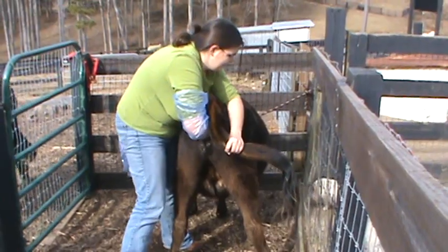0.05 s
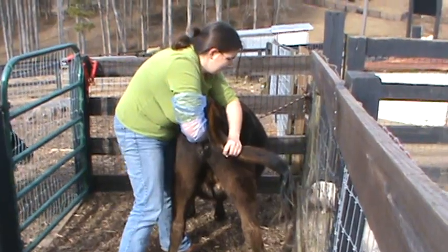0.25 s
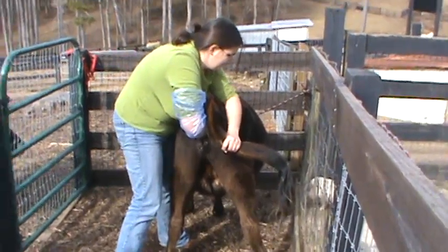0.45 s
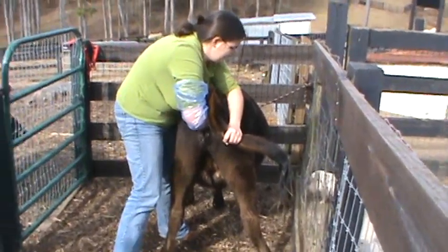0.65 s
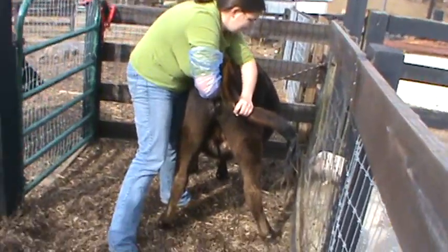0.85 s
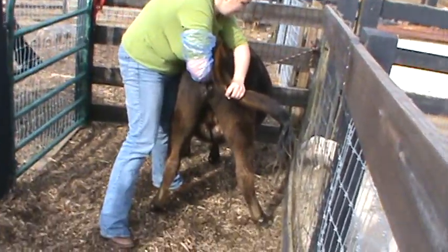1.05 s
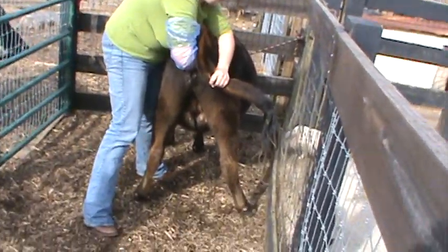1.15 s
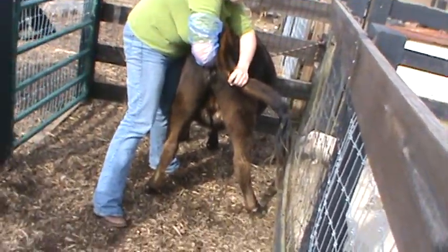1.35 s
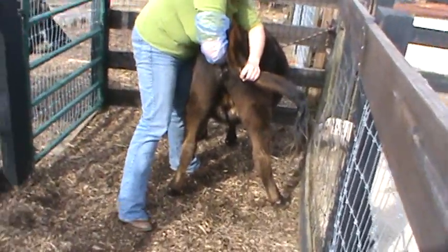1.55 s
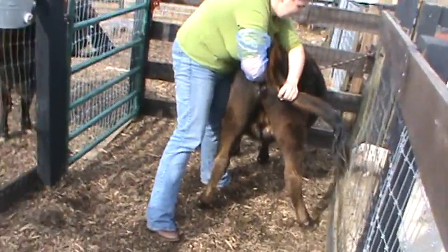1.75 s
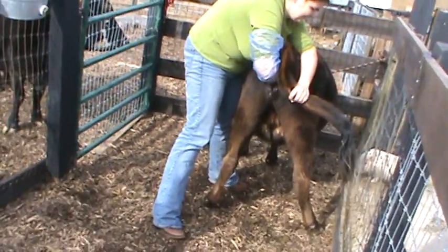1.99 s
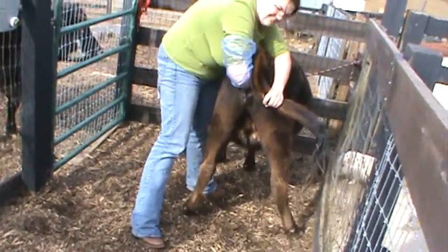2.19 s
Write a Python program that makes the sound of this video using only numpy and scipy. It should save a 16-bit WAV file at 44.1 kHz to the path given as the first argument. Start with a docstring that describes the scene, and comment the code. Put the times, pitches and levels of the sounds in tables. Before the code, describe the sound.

A cow's hooves shuffle on dry wood chips in an outdoor pen under soft, steady farm air. Light rustles and a short scuff come near 0.4 s, then a scrape and faint dull knocks around 1 s. Crunching and snapping thicken from 1.2 s. At 1.56 s a loud, dry kick cracks and clatters on a fence board. A low wind buffet hits the microphone at 1.8 s; small snaps and rustling continue to the end.

```python
"""A cow shifts its hooves on wood-chip bedding in an outdoor pen, over soft farm air that is shaped noise.
From the start, clouds of tiny clicks make the crunch and rustle, ringing grit makes short scuffs,
and bursts of noise make single snaps, most of them after 1.2 s. Faint knocks come near 1 s.
At 1.56 s a kick knocks a fence board, a sum of fading tones with cracks and clatter.
From about 1.8 s a gust buffets the microphone: smooth pressure dips over low rumble."""
import sys
import numpy as np
from scipy import signal
from scipy.fft import rfft, irfft
from scipy.io import wavfile
from scipy.ndimage import uniform_filter1d

SR = 44100
rng = np.random.default_rng(int(sys.argv[2]) if len(sys.argv) > 2 else 0)


def wav_out(sig):
    """Save sig, one row per channel (or a flat mono array), as 16-bit PCM at SR to the path in sys.argv[1]."""
    wavfile.write(sys.argv[1], SR, np.round(np.clip(np.atleast_2d(sig).T, -1, 1) * 32767).astype(np.int16))


N = 98034  # length in samples

# Tone of the farm air, before its level is set: (f/Hz, level/dB)
AIR_SPECTRUM = [(25, -21), (80, 2), (500, -5.5), (1800, -20), (8100, -19.5), (11000, -27), (16000, -27)]
# How wide the spread-out sounds are: (f/Hz, side minus mid/dB)
STEREO_WIDTH = [(40, -24), (200, -17.5), (2000, -5.5), (6000, -13), (12000, -7.5)]
# Wind buffets, before filtering: (t/s of the middle, peak level/dB, width/ms)
BUFFETS = [(.735, -41, 4.5), (1.803, -24, 2.7), (1.815, -22, 6.8), (1.833, -22, 1.76), (1.8422, -26, 2.3),
           (1.856, -33, 4.9), (1.879, -35, 3.4), (1.913, -32, 3.1), (2.207, -40, 3)]
# Loudness of the wind rumble, before it wanders: (t/s, level/dB)
RUMBLE_LEVEL = [(1.45, -58), (1.62, -44.5), (1.85, -43), (1.94, -46.5), (2.1, -56.5)]
# Chips under moving weight, before wandering: (t/s, dull crunch level/dB, fine rustle level/dB)
SHUFFLE_LEVELS = [(0, -55, -85), (.38, -54.5, -60), (.44, -43, -43), (.49, -51.5, -51.5), (.6, -53, -51),
                  (.7, -54.5, -57), (0.939, -53, -58.5), (1.04, -50.5, -48.5), (1.151, -46, -47),
                  (1.182, -38, -48), (1.24, -43.5, -48), (1.3, -39.5, -43.5), (1.41, -41, -42),
                  (1.53, -47.5, -46), (1.6, -41, -45), (1.7, -46, -50.5), (1.83, -50, -45),
                  (1.87, -51.5, -53), (1.97, -50.5, -54), (1.99, -49.5, -42.5), (2.14, -48, -49.5),
                  (2.22, -50, -37.5)]
# Tone of the crunch and of the rustle, before their levels are set: (f/Hz, level/dB)
CRUNCH_SPECTRUM = [(120, -7.5), (400, 1.5), (1200, -2.5), (2500, -10), (12000, -36)]
RUSTLE_SPECTRUM = [(1500, -6.5), (6000, -5), (8700, -1.5), (10800, -11.5), (15000, -18)]
# A hoof dragged through chips: (start t/s, length/s, level/dB, treble minus bass/dB, left minus right/dB)
SCUFFS = [(0.161, 0.046, -54.5, 17.5, -1), (0.387, 0.12, -45, 1, 1), (0.669, 0.02, -54, 16, 2),
          (0.958, 0.088, -38, 1, -3.5), (1.286, 0.058, -43, 15, 1), (1.406, 0.088, -32, -1, -3.5),
          (1.893, 0.0052, -33, 3, 4), (2.19, 0.031, -38.5, 7.5, 4)]
# Resonances of the grit: (f/Hz, width of each of two passes/Hz, relative level/dB)
GRIT_RINGS = [(2545, 1400, 2.5), (4000, 870, -5.5), (5260, 650, -4), (6690, 940, 0.5), (8150, 2030, 0.5)]
# Single chips snapping: (t/s, peak level/dB, f/Hz, left minus right/dB)
SNAPS = [(0.0868, -30, 6900, 0.5), (0.8738, -30, 8200, 1), (0.8801, -22, 8800, 3.5),
         (1.2929, -22.5, 4400, 6.5), (1.327, -21, 5000, 2.5), (1.3522, -17, 2120, 0),
         (1.3578, -28, 5000, 1.5), (1.3735, -24.5, 4000, 1.5), (1.4622, -15.5, 7760, 9),
         (1.4963, -18, 9060, 5), (1.5253, -22.5, 8040, 1.0), (1.7915, -24, 4240, -7),
         (1.9493, -20.5, 6600, 6), (1.9761, -18, 7650, 5), (2.0932, -19.5, 4650, 5.5),
         (2.194, -20.5, 7000, 10)]
# Blows on the fence board: (t/s, peak level of the ring/dB, contact/ms, left minus right/dB)
BLOWS = [(0.959, -35.5, 1.2, 0), (1.03, -32, 1.6, 0.5), (1.06, -27, 1.16, -1), (1.067, -25.5, 0.75, -2),
         (1.559, -6, 0.48, 5.5), (1.5634, -12.5, 0.88, -3), (1.5772, -10, 0.11, 6.5),
         (1.5804, -20.5, 0.18, -9), (1.596, -21, 0.11, -3), (1.7916, -26, 0.32, -3)]
# Tones of the board: (f/Hz, relative level/dB, time to fade by 60 dB/s)
BOARD_TONES = [(222, 1.5, 0.028), (370, -4, 0.077), (554, 5, 0.014), (756, -0.5, 0.02), (983, 0.5, 0.016),
               (1417, -11.5, 0.036), (1600, -5.5, 0.021), (1890, 0, 0.016), (2190, -0.5, 0.014),
               (3900, -5, 0.0096)]

AIR_DB = -50
BUFFET_HZ, BUFFET_WIDTH_HZ = 68, 89
GUST_SIDE_DB = -0.5
PEN_DB, PEN_T60_S, PEN_HZ = -22, 0.23, 1600
SHUFFLE_PAN_DB = 1.6  # left minus right
SCUFF_EDGE = 0.19  # fade-in as a share of the scuff; the fade-out is twice as long
SCUFF_SPLIT_HZ = 3500  # border between scuff bass and treble
SNAP_T60_S, SNAP_WIDTH = 0.007, 0.45  # width is a share of the pitch
CRACK_DB, CRACK_S, CLATTER_DB, CLATTER_S = -4, 0.00053, -17.5, 0.011
THIN_HZ_MS = 50.6  # divided by the contact in ms, gives the bass cut in Hz
SWELL_CYCLES = 0.3  # how many cycles a board tone takes to swell
BASS_PER_PAN_DB = 0.28
DULL_HZ, TOP_HZ = 8600, 15800  # treble limits of the hits and of the whole sound


def amp(db):
    """Turn decibels into a multiplier."""
    return 10 ** (np.asarray(db) / 20)


def unit(x):
    """Scale to an average (RMS) strength of 1."""
    return x / np.sqrt(np.mean(x ** 2))


def read(table, hz):
    """Read the dB of a spectrum table on a log frequency axis."""
    f, db = np.array(table).T
    return np.interp(np.log(hz + 1), np.log(f), db)


def colour(x, table):
    """Shape the tone of a sound with a spectrum table."""
    gain = amp(read(table, np.fft.rfftfreq(N, 1 / SR)))
    return irfft(rfft(x) * gain, N)


def ring(x, hz, width_hz):
    """Resonate around one pitch, with gain 1 at the centre."""
    return signal.lfilter(*signal.iirpeak(min(hz, 18000), hz / width_hz, fs=SR), x)


def pan(x, db):
    """Make stereo with the left louder than the right by db."""
    return np.array([x * amp(db / 2), x * amp(-db / 2)])


def walk(rate):
    """Wander smoothly at random, with about `rate` new values a second."""
    k = int(SR / rate)
    steps = np.repeat(rng.standard_normal(N // k + 1), k)
    smooth = uniform_filter1d(uniform_filter1d(steps, k), k)
    return unit(smooth[:N])


def grains(rate, scatter_db):
    """Scatter random clicks, about `rate` a second, with a few larger ones."""
    present = rng.random(N) < rate / SR
    size = rng.standard_normal(N)
    boost = amp(scatter_db * np.minimum(rng.exponential(size=N), 4))
    return unit(present * size * boost)


def wide(make):
    """Spread a sound by building mid and side from two separate random draws."""
    mid = make()
    side = colour(make(), STEREO_WIDTH)
    return np.array([mid + side, mid - side])


def add(out, s, sound):
    """Mix a sound in at time s, cutting what runs past the end."""
    i = int(s * SR)
    out[:, i:i + sound.shape[1]] += sound[:, :N - i]


def farm_air():
    """Shaped noise whose level wanders slightly gives the steady air of the farm."""
    noise = wide(lambda: unit(colour(rng.standard_normal(N), AIR_SPECTRUM)))
    return noise * amp(AIR_DB + .5 * walk(10.4))


def wind(t):
    """Wind presses on the microphone: soft dips, uneven between its sides, over a little rumble."""
    push = sum(-amp(db) * np.exp(-((t - s) * 1000 / (ms / 2)) ** 2) for s, db, ms in BUFFETS)
    thump = signal.lfilter(*signal.butter(2, 52, "high", fs=SR), push)
    thump = thump + 2.47 * ring(push, BUFFET_HZ, BUFFET_WIDTH_HZ)
    s, db = np.array(RUMBLE_LEVEL).T
    rumble = wide(lambda: unit(ring(rng.standard_normal(N), 70.0, 76.0)))
    rumble = rumble * amp(np.interp(t, s, db) + 1.1 * walk(10.8))
    flutter = unit(ring(rng.standard_normal(N), 97.0, 100.0))
    # opposite signs left and right make the push uneven
    side = amp(GUST_SIDE_DB) * uniform_filter1d(push, size=400) * flutter * np.array([[1], [-1]])
    return thump + side + rumble


def pen(x):
    """Rails and walls scatter the sound back as a fading, dull tail of noise."""
    u = np.arange(int(.3 * SR)) / SR
    fade = amp(-60 * u / PEN_T60_S) * (u > .004)  # silent for the first 4 ms
    tails = rng.standard_normal((2, len(u))) * fade
    tails = signal.lfilter(*signal.butter(1, PEN_HZ, fs=SR), tails)
    tails /= np.sqrt(np.sum(tails ** 2, axis=1, keepdims=True))
    return amp(PEN_DB) * signal.fftconvolve(x, tails, axes=1)[:, :N]


def shuffle(t):
    """Chips crunch and rustle under moving weight, as two clouds of tiny clicks."""
    s, crunch_db, rustle_db = np.array(SHUFFLE_LEVELS).T
    crunch = wide(lambda: unit(colour(grains(4000., 2.7), CRUNCH_SPECTRUM)))
    crunch = crunch * amp(np.interp(t, s, crunch_db) + 1.3 * walk(17.38))
    rustle = wide(lambda: unit(colour(grains(8000., 2.0), RUSTLE_SPECTRUM)))
    rustle = rustle * amp(np.interp(t, s, rustle_db) + 2.25 * walk(25.25))
    return (crunch + rustle) * pan(np.ones(1), SHUFFLE_PAN_DB)


def scuffs(t):
    """Dense grit rings short, flickering resonances while a hoof drags."""
    low, high = np.zeros(N), np.zeros(N)
    for f, width, db in GRIT_RINGS:
        grit = ring(ring(grains(6000., 2.3), f, width), f, width)
        band = high if f > SCUFF_SPLIT_HZ else low
        band += amp(db + 2.9 * walk(90.)) * grit
    scale = np.std(low + high)
    low, high = low / scale, high / scale
    out = 0
    for s, length, db, treble_db, pan_db in SCUFFS:
        u = (t - s) / length  # runs from 0 to 1 during the scuff
        env = np.clip(np.minimum(u, (1 - u) / 2) / SCUFF_EDGE, 0, 1)
        drag = low * amp(db - treble_db / 2) + high * amp(db + treble_db / 2)
        out = out + pan(env * drag, pan_db)
    return out


def snaps():
    """Each snapping chip is a fading burst of noise in a broad band around its own pitch."""
    out, u = np.zeros((2, N)), np.arange(600) / SR
    for s, db, hz, pan_db in SNAPS:
        noise = rng.standard_normal(600)
        noise[0] = 4.  # the first crack is sharp
        x = ring(noise, hz, SNAP_WIDTH * hz) + 0.14 * noise
        x = x * amp(-60 * u / SNAP_T60_S)
        add(out, s, pan(x / np.abs(x).max() * amp(db), pan_db))
    return out


def knocks():
    """A brief push rings the board; short contacts are thin and crack, long ones dull; clatter fades."""
    out, u = np.zeros((2, N)), np.arange(4000) / SR
    board = np.zeros(4000)
    for k, (f, db, t60) in enumerate(BOARD_TONES):
        swell = 1 - np.exp(-(u * f / SWELL_CYCLES) ** 2)  # low tones take longer to swell
        board += (-1) ** k * amp(db - 60 * u / t60) * swell * np.sin(2 * np.pi * f * u)
    for s, db, ms, pan_db in BLOWS:
        push = np.sin(np.pi * np.clip(u[:200] * 1000 / ms, 0, 1))  # half a sine wave
        x = np.convolve(board, push)[:4000]
        x = signal.lfilter(*signal.butter(2, THIN_HZ_MS / ms, "high", fs=SR), x)
        crack_noise, clatter_noise = rng.standard_normal((2, 4000))
        crack = amp(CRACK_DB) * crack_noise * np.exp(-u / CRACK_S) * min(0.35 / ms, 1) ** 2
        clatter = amp(CLATTER_DB) * unit(ring(clatter_noise, 1430.0, 1660.0)) * np.exp(-u / CLATTER_S)
        x = (x / np.abs(x).max() + crack + clatter) * amp(db)
        # ringing bass is added to the louder side and taken from the other
        bass = BASS_PER_PAN_DB * pan_db * ring(x, 89.0, 127.0) * np.array([[1], [-1]])
        add(out, s, pan(x, pan_db) + bass)
    return out


def scene():
    """Dull the hits, let the pen answer them, and mix in the rest."""
    t = np.arange(N) / SR
    hits = knocks() + snaps() + scuffs(t)
    hits = signal.lfilter(*signal.butter(2, DULL_HZ, fs=SR), hits)
    return farm_air() + wind(t) + pen(hits) + shuffle(t) + hits


def record(dry):
    """A camcorder cuts the top: a steep filter removes the highest treble."""
    top_cut = signal.ellip(10, .2, 75, TOP_HZ, fs=SR, output="sos")
    return signal.sosfilt(top_cut, dry)


dry = scene()
out = record(dry)
wav_out(out)
```